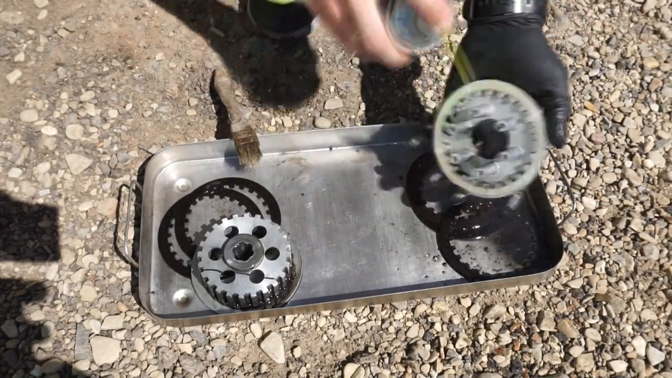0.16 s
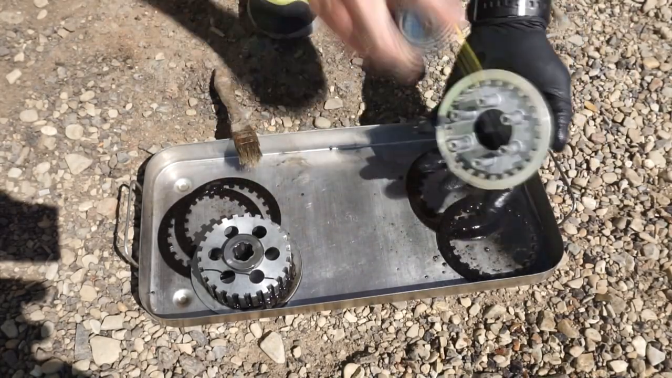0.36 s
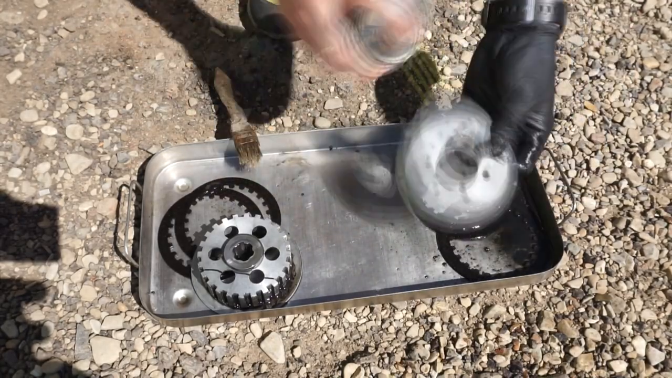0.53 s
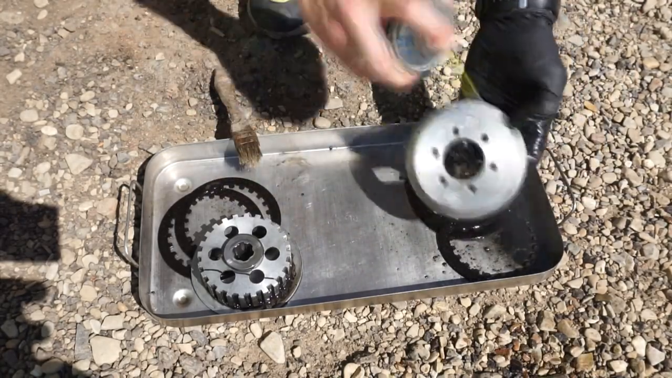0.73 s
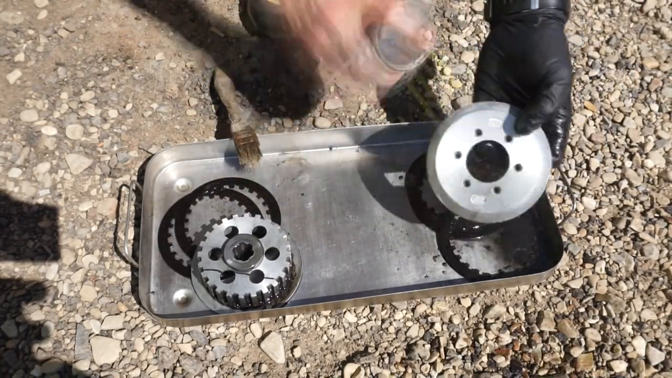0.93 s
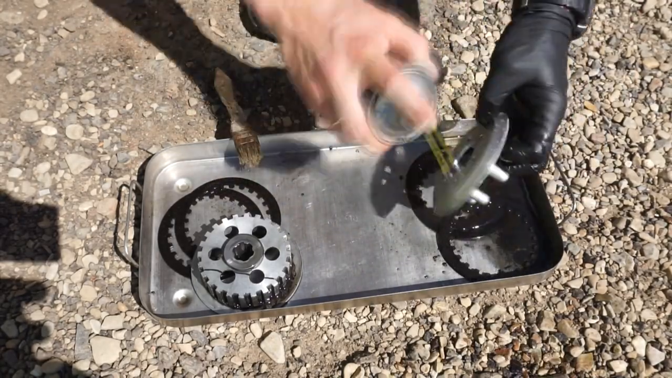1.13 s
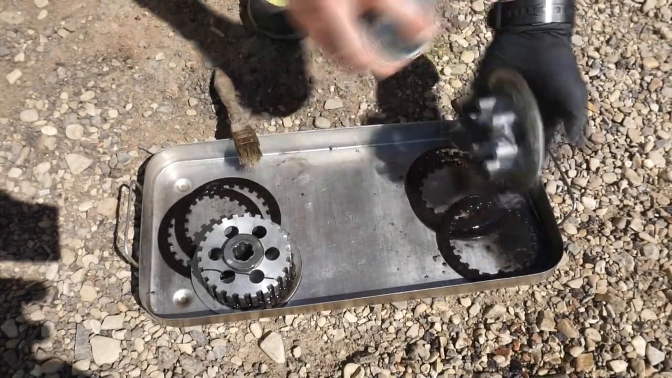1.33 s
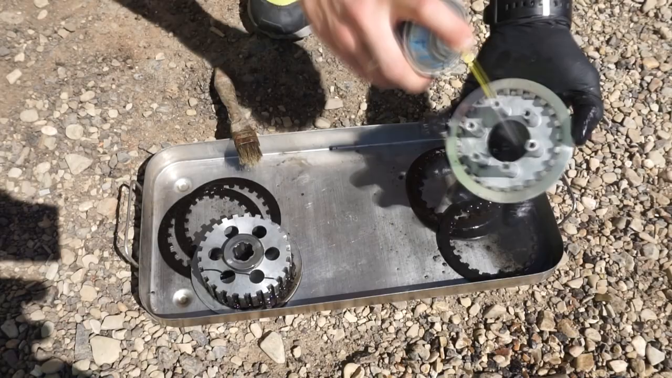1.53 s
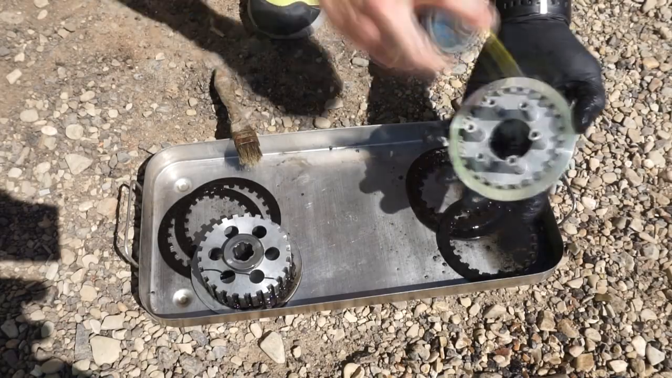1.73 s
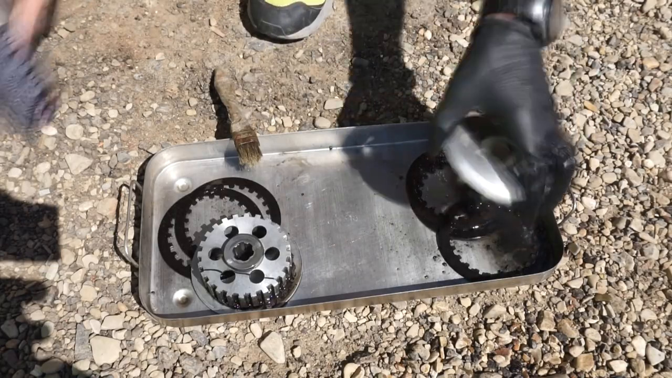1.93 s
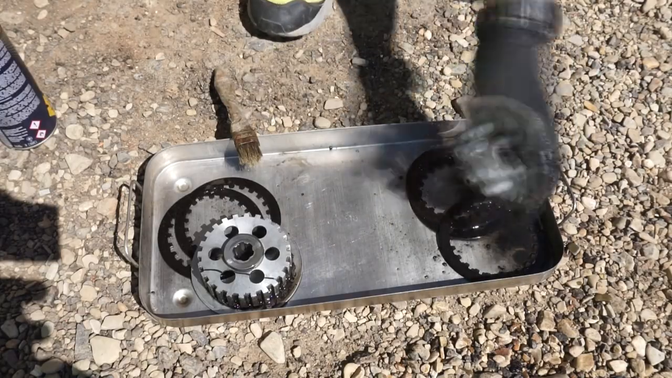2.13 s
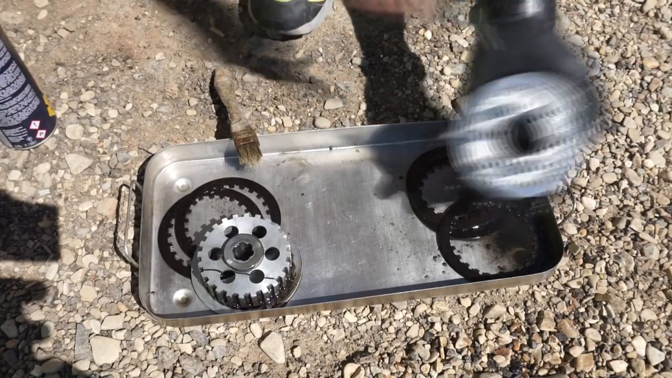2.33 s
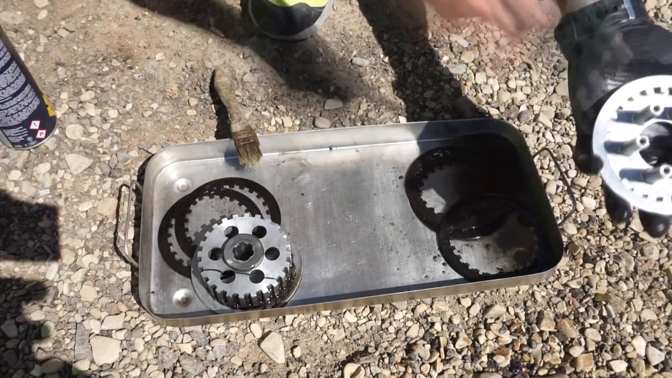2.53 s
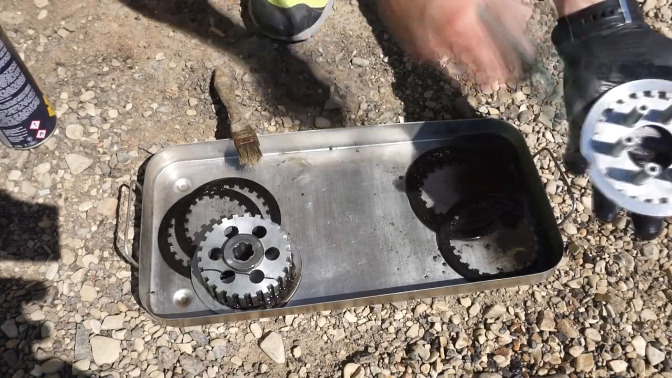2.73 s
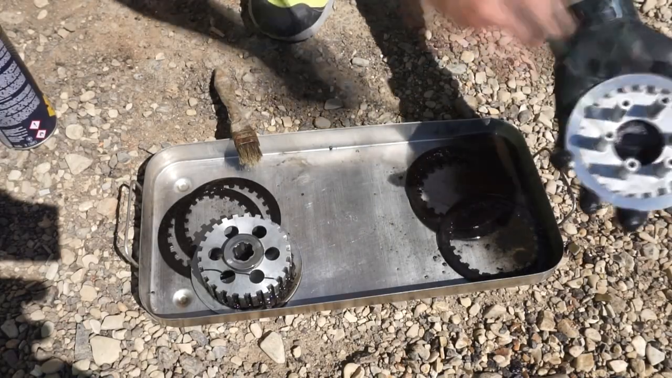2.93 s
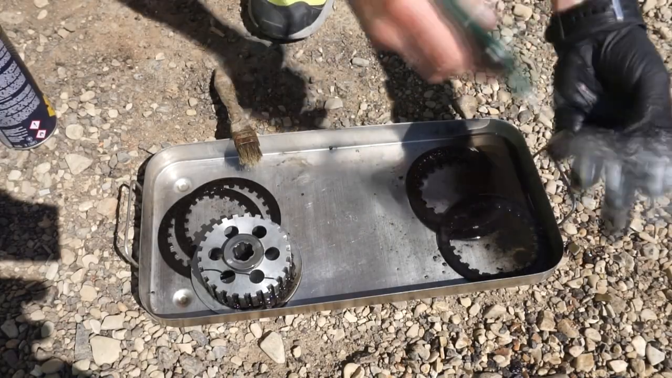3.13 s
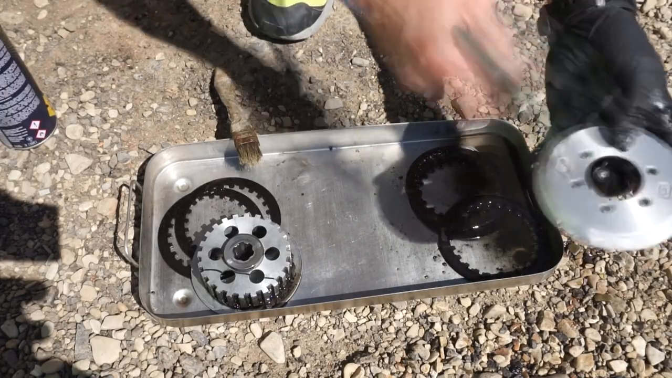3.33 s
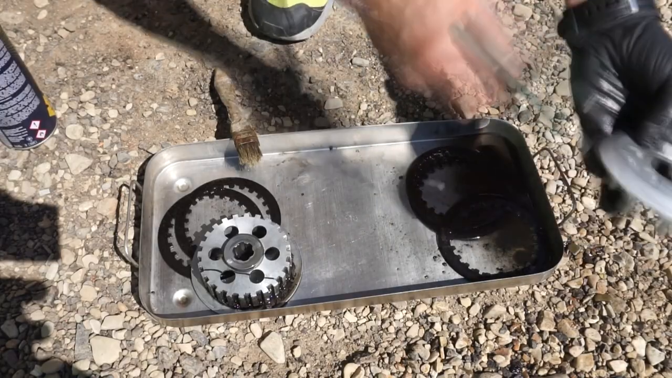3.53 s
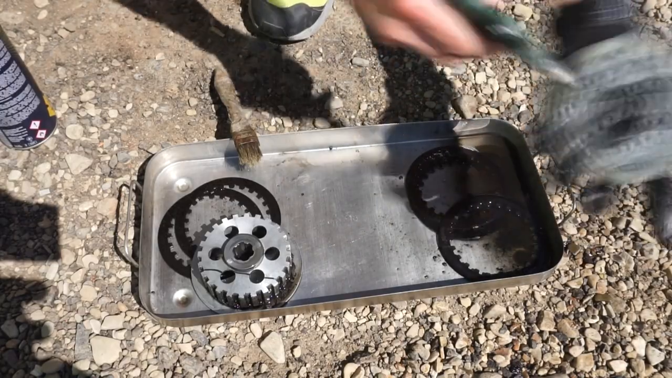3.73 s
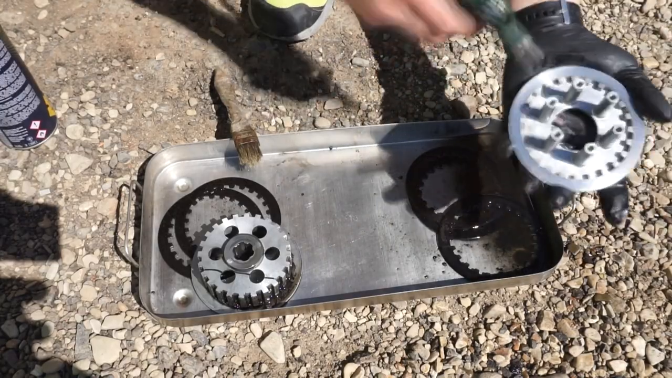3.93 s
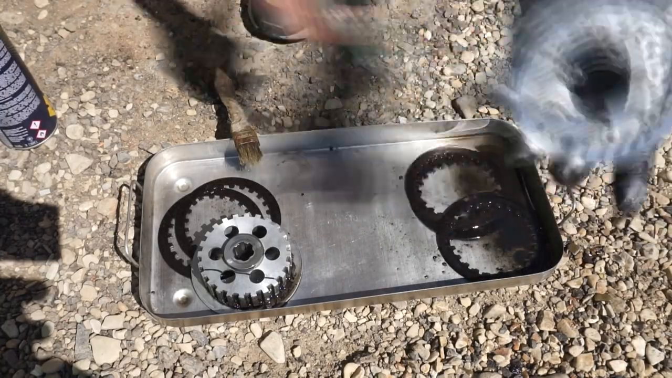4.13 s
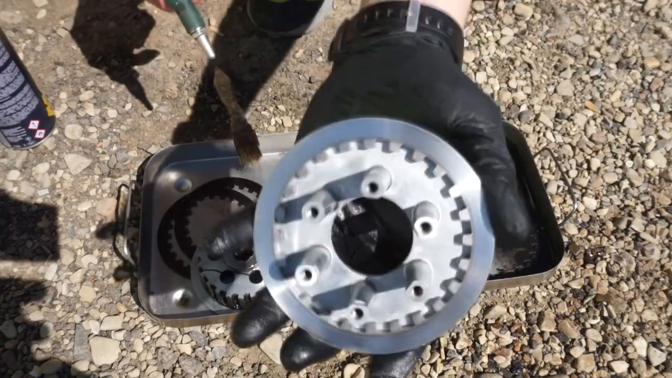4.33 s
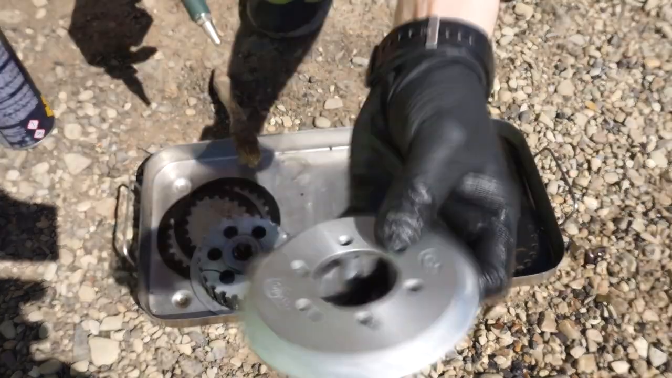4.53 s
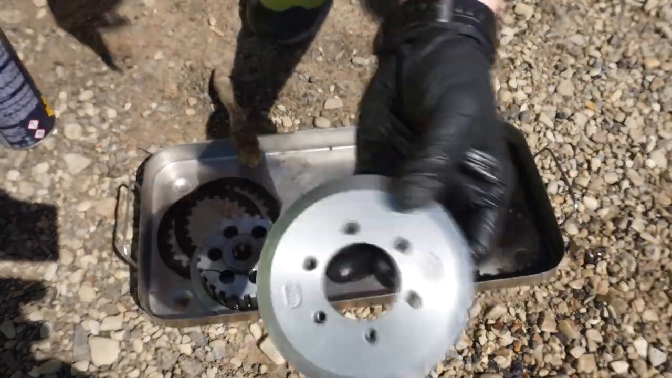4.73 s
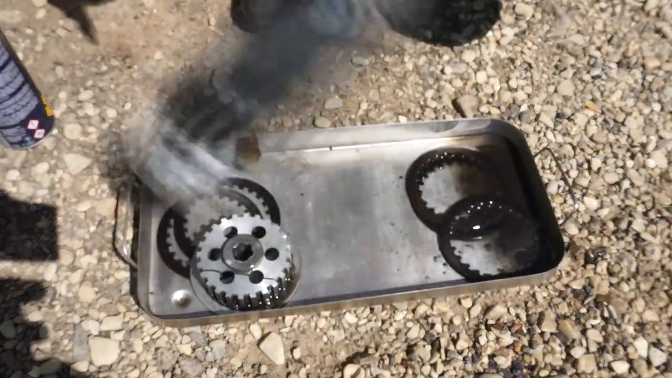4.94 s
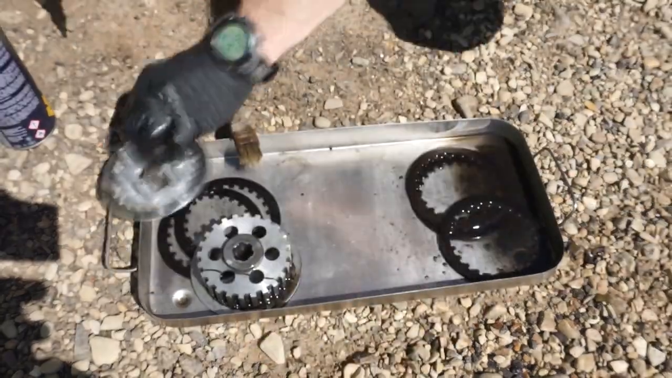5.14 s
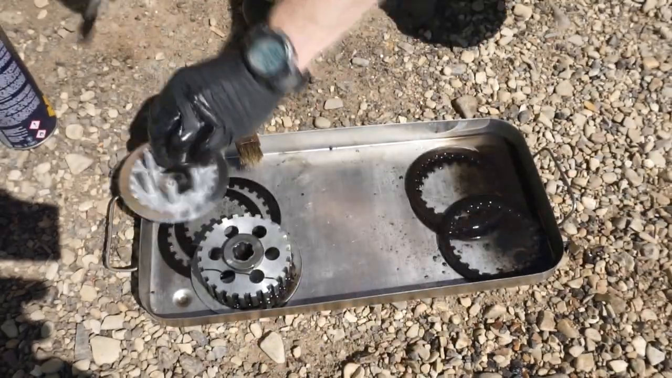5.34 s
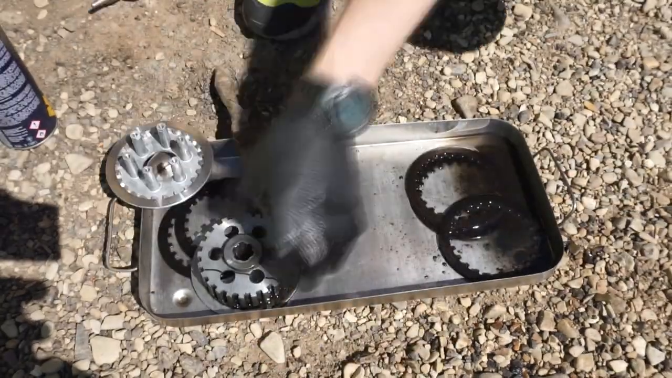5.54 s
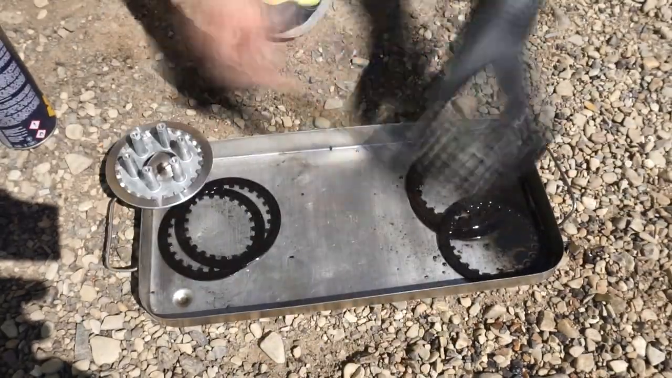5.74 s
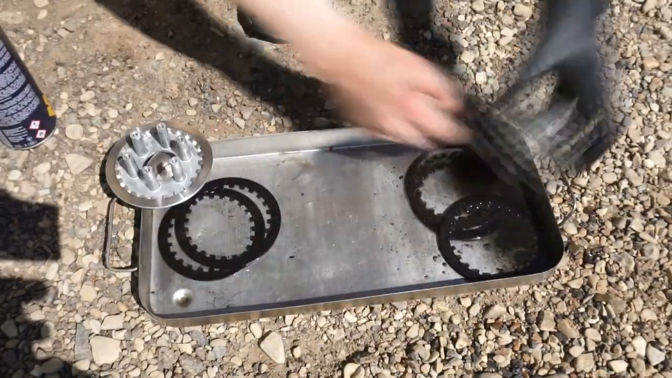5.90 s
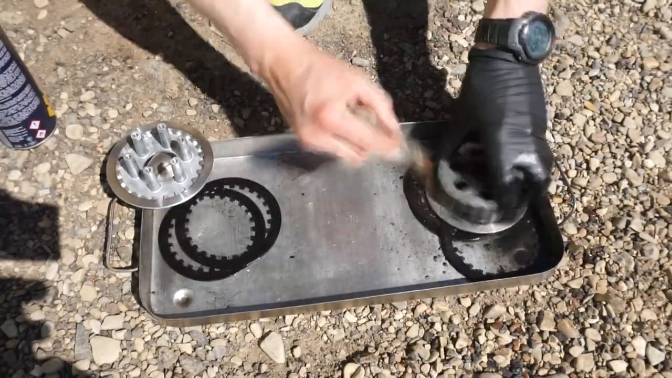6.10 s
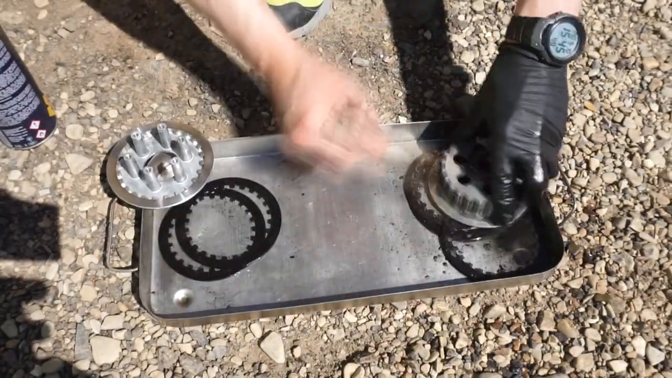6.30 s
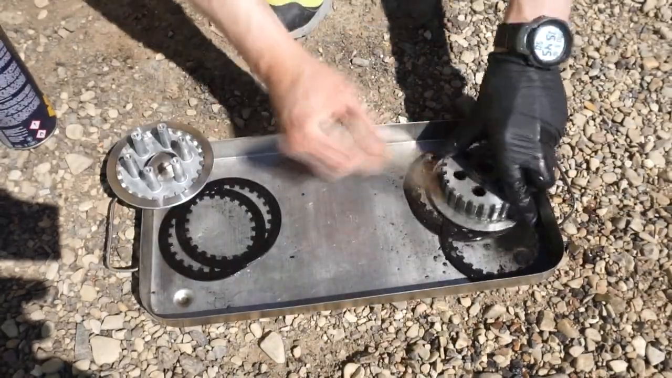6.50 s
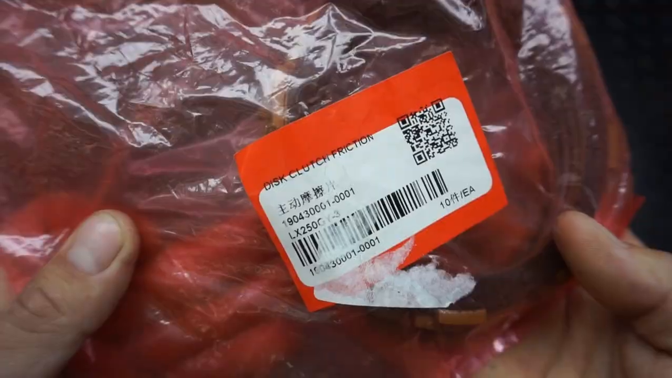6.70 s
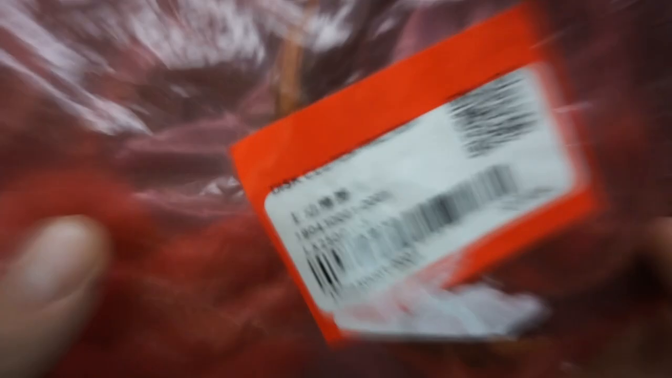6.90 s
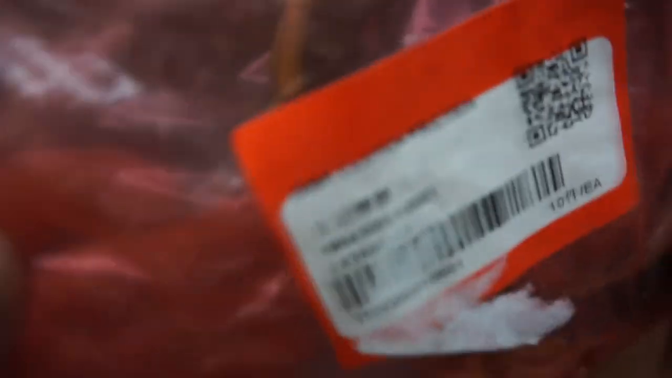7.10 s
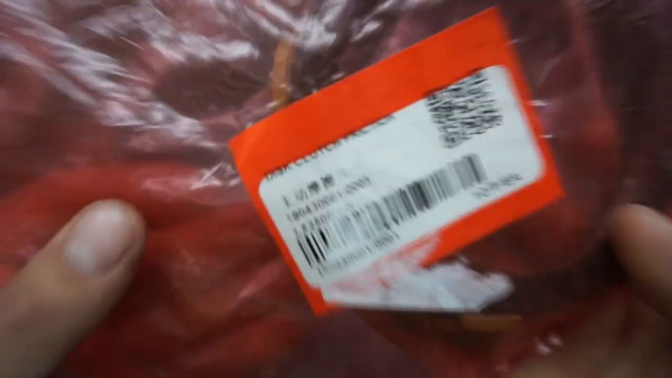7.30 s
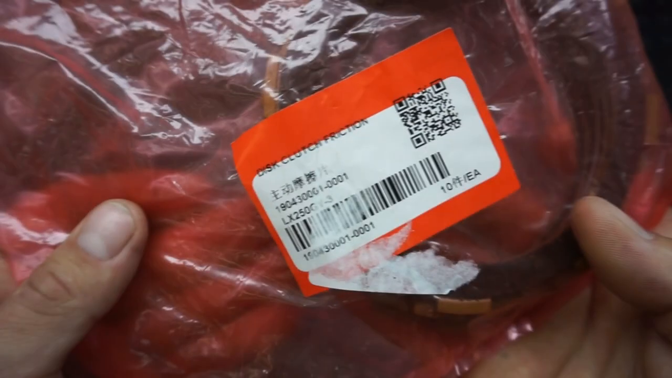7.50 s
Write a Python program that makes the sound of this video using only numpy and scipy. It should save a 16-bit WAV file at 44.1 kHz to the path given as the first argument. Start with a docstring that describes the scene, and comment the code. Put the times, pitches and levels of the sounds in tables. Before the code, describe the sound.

Outdoors, hissing spray bursts and harder air jets, metallic scraping and brushing, a vehicle-like rumble swelling, then a hard cut to crinkling plastic bag indoors.

```python
"""On gravel outdoors, clutch parts are cleaned over a metal tray; the scene then jumps indoors to a plastic bag.
Aerosol squirts and hard air blasts are turbulent noise coloured by the part; liquid drums on the tray as dull grains.
Scrapes and clinks excite the modes of a clutch hub, bristles hiss in strokes, and a rumble, like a vehicle's,
draws near as filtered noise with a sinking note. Indoors the film crackles in decaying sines and tuned snaps."""
import sys
import numpy as np
from scipy import signal
from scipy.fft import rfft, irfft, next_fast_len
from scipy.io import wavfile
from scipy.ndimage import uniform_filter1d

SR = 44100
rng = np.random.default_rng(int(sys.argv[2]) if len(sys.argv) > 2 else 0)


def to_wav(s):
    """Save 16-bit WAV."""
    ch = np.atleast_2d(s).T  # columns
    pcm = np.round(np.clip(ch, -1, 1) * 32767)  # PCM
    wavfile.write(sys.argv[1], SR, pcm.astype(np.int16))


N = 337799
T = np.arange(N) / SR  # s
JUMP_S = 6.628  # outdoors ends, indoors begins

# noise density of bristles and fine liquid fizz: [f/Hz, relative level/dB]
BRISTLE_SPECTRUM = [(800, -2.5), (2200, 2.5), (3500, 0), (5600, -1.5), (7000, -1), (10500, -0.5),
                    (13000, -8.5), (16000, -19.5)]
# noise density of gritty metal contact: [f/Hz, relative level/dB]
GRIT_SPECTRUM = [(300, -47), (700, 6.5), (1000, 4.5), (1500, 6.5), (2400, 3.5), (3300, -10), (5000, -11.5),
                 (11000, -30), (13500, -37)]
# how three places reach the two microphones:
# [f/Hz, left minus right level/dB, coherence, left's phase lead/rad]
CAN_PLACE = [(500, -0.5, 0.82, 0.3), (2500, -1.5, 0.88, 0), (4470, -1, 0.94, -0.26), (8900, 0.5, 0.74, 0.8),
             (11900, 4.5, 0.84, -2.03), (15000, -4, .3, -2)]
RIGHT_PLACE = [(120, 9.5, 0.68, 2.5), (494, -1.5, 1, -1.3), (2420, -5, 0.78, 0.7), (3650, -6, 0.31, -0.76),
               (6910, -2, 0.98, -1.22), (11370, 3, 0.37, -2.5), (14850, -2.5, 0.34, -5.5)]
LEFT_PLACE = [(402, -1, 1, 0.68), (2000, 1, 0.88, 0.0061), (3980, 3, 0.4, 0.012), (11750, 4.5, 0.14, 1)]


def amp(db):
    """Amplitude ratio of a level in dB."""
    return 10 ** (np.asarray(db) / 20)


def evened(x):
    """Normalization to unit rms."""
    return x / np.sqrt(np.mean(x ** 2) + 1e-20)


def read(points, hz, axis=1):
    """Interpolation of one table column over logarithmic frequency."""
    columns = np.transpose(points)
    return np.interp(np.log(hz + 1), np.log(columns[0] + 1), columns[axis])


def level(rows):
    """Gain over time from a piecewise linear level curve."""
    return amp(np.interp(T, *np.transpose(rows)))


def add(mix, s, sound):
    """Superposition: adds a sound to the mix, in place, from time s."""
    part = mix[:, round(s * SR):][:, :sound.shape[1]]
    part += sound[:, :part.shape[1]]


def filtered(x, gain):
    """Linear filtering: multiplies the spectrum by a gain given as a function of f/Hz."""
    size = next_fast_len(x.shape[-1], True)
    spectrum = rfft(x, size) * gain(np.fft.rfftfreq(size, 1 / SR))
    return irfft(spectrum, size)[..., :x.shape[-1]]


def placed(z, place):
    """Interaural-style cues: level difference, coherence and phase lead made from two unrelated signals."""
    def same(hz):
        return np.clip(read(place, hz, axis=2), 0, 1)

    def lead(hz):
        return read(place, hz, axis=3) * np.minimum(hz / 1000, 1)  # long waves arrive nearly in step

    right = filtered(z[0], lambda hz: same(hz) * np.exp(-1j * lead(hz)))
    right += filtered(z[1], lambda hz: np.sqrt(1 - same(hz) ** 2))
    return filtered(np.array([z[0], right]), lambda hz: amp(np.outer([.5, -.5], read(place, hz))))


def coloured(z, spectrum):
    """Spectral shaping with a bass roll-off below 20 Hz, at unit rms."""
    return evened(filtered(z, lambda hz: amp(read(spectrum, hz)) * hz / (hz + 20)))


def noise():
    """Gaussian white noise in two independent channels."""
    return rng.standard_normal((2, N))


def grains(per_s, spread_db):
    """Random point process of tiny impacts with skewed sizes: a few are much larger than the rest."""
    size_db = spread_db * np.minimum(rng.exponential(1, N), 4)
    size = amp(size_db) * (rng.random(N) < per_s / SR)
    return evened(size * noise())


def two_bands(x, split_hz, low_gain, high_gain):
    """Band splitting: each band is brought to unit rms and follows its own gain."""
    low = filtered(x, lambda hz: 1 / (1 + (hz / split_hz) ** 10))
    return evened(low) * low_gain + evened(x - low) * high_gain


def impulse(spectrum, tilt_db=0, size=4096):
    """Minimum-phase click by cepstral folding; the tilt in dB per octave takes hold above about 1 kHz."""
    hz = np.fft.rfftfreq(size, 1 / SR)
    cepstrum = irfft(np.log(amp(read(spectrum, hz) + tilt_db * np.log2(1 + hz / 1000))))
    cepstrum[1:size // 2] *= 2
    cepstrum[size // 2 + 1:] = 0
    return irfft(np.exp(rfft(cepstrum)))


def blow(click, scatter, decay_s, size=4096):
    """Impact with chatter: a click convolved with a spike and decaying noise, at peak 1."""
    drive = scatter * rng.standard_normal((2, size)) * np.exp(-np.arange(size) / SR / decay_s)
    drive[0, 0] = 1
    drive[1, 0] = rng.choice([-1, 1])
    sound = signal.fftconvolve(drive, click[None], axes=1)[:, :size]
    return sound / abs(sound).max()


def gate(start, end, ramp_s):
    """Smooth switching: cubic ramps, at half height at start and end."""
    rise, fall = np.clip((np.array([T - start, end - T]) / ramp_s + 1) / 2, 0, 1)
    opening = np.minimum(rise, fall)
    return opening ** 2 * (3 - 2 * opening)


def swell(s, rise_s, fall_s):
    """Exponential growth to 1 at time s, then exponential decay."""
    return np.exp(-np.minimum(np.maximum((s - T) / rise_s, (T - s) / fall_s), 40))


def shifting(x, depth_db, size):
    """Time-varying resonance: smooth random gains over the spectrogram, changing over about size frames."""
    z = signal.stft(x, nperseg=512)[2]
    patches = rng.standard_normal(z.shape[1:])
    for _ in range(2):
        patches = uniform_filter1d(patches, size=3, axis=0)
        patches = uniform_filter1d(patches, size=size, axis=1)
    return signal.istft(z * amp(depth_db * evened(patches)), nperseg=512)[1][:, :N]


def ring(x):
    """Modal superposition: the hub's resonances answer any drive, neighbours in opposite phase."""
    # modes of a clutch hub against the tray rim: [f/Hz, half-power width/Hz, relative level/dB]
    hub_modes = [(707, 48.4, 8.5), (1430, 81, 1), (1800, 30, -1.5), (2070, 90, -1), (2570, 34, -9),
                 (3810, 41, -12.5), (4370, 39, -15), (5450, 18, -17), (6030, 25, -20.5), (6540, 30, -17.5),
                 (7060, 48, -11.5), (7560, 42, -11.5), (9060, 38, -13.5), (10630, 47, -9.5)]

    def response(hz):
        total = 0
        for k, (f, width, db) in enumerate(hub_modes):
            total = total + (-1) ** k * amp(db) / (1 + 1j * (hz - f ** 2 / (hz + 1)) / width)
        return total

    return filtered(x, response)


def rocking(x, depth, rate_hz):
    """Frequency modulation by a wandering delay: low modes bend by an rms share depth, high ones stay steady."""
    bend = filtered(rng.standard_normal(N), lambda hz: (hz / rate_hz) ** 2 / (1 + (hz / rate_hz) ** 6))
    drift = np.cumsum(depth * evened(bend))
    low = filtered(x, lambda hz: 1 / (1 + (hz / 4400) ** 10))
    moment = np.arange(N) + drift - drift.mean()
    return x - low + np.array([np.interp(moment, np.arange(N), side) for side in low])


def jet(spectrum, place, presses, wet_db, swell_db, ramp_s, cavity_db, flutter_db):
    """Turbulent jet noise; holes and ribs of the turning part lend it shifting resonances."""
    z = shifting(placed(noise(), place), cavity_db, size=18)
    splash = hiss = 0
    for opens, shuts, hiss_db, splash_db in presses:
        growth_db = swell_db * np.interp(T, [opens, shuts], [-.5, .5])
        flow = gate(opens, shuts, ramp_s) * amp(growth_db)
        splash = splash + amp(splash_db) * flow
        hiss = hiss + amp(hiss_db) * flow
    flutter = flutter_db * evened(uniform_filter1d(rng.standard_normal(N), size=900))
    # impact on the part lies below 6.5 kHz, nozzle hiss above
    return two_bands(coloured(z, spectrum), 6500, splash * amp(wet_db + flutter), hiss * amp(flutter / 2))


def aerosol():
    """Jet noise in short squirts; cavity resonance makes pockets of the hub hoot as the stream passes over."""
    # presses of the can's valve: [opens t/s, shuts t/s, nozzle hiss level/dB, splash on the part level/dB]
    squirts = [(0.024, 0.154, -35.5, -40.5), (0.237, 0.388, -34.5, -42), (0.44, 0.489, -34, -40),
               (0.535, 0.565, -35.5, -43.5), (0.674, 0.852, -37.5, -43.5), (0.919, 1.062, -36, -44.5),
               (1.116, 1.19, -36, -42.5), (1.223, 1.335, -37.5, -43), (1.489, 1.546, -36.5, -43.5),
               (1.584, 1.714, -33.5, -39.5), (1.73, 1.847, -35.5, -41.5)]
    # noise density of the spray: [f/Hz, relative level/dB]
    spray_spectrum = [(400, -18), (900, -11.5), (1250, -2), (1550, -8.5), (2200, -3.5), (3300, -7),
                      (4400, -3.5), (6400, -3), (8000, 3), (10400, 3.5), (12500, 0.5), (15700, -4)]
    # the stream passes over a pocket: [t/s]
    pocket_times = [1.03, 1.16, 1.54, 1.8]
    pocket_hz, pocket_width_hz, pocket_db, pocket_s = 2120, 230, 9, 0.018
    # each squirt grows by swell_db as the finger presses home
    spray = jet(spray_spectrum, CAN_PLACE, squirts, wet_db=0, swell_db=2.5,
                ramp_s=0.023, cavity_db=1.8, flutter_db=0.7)
    hoot = filtered(spray, lambda hz: 1 / (1 + ((hz - pocket_hz) / pocket_width_hz) ** 2))
    passing = sum(swell(s, pocket_s, pocket_s) for s in pocket_times)
    return spray + hoot * (amp(pocket_db * passing) - 1)


def air_blasts():
    """Stronger jet noise off to the right, with a delayed, low-passed reflection from further away."""
    # blasts of air: [opens t/s, shuts t/s, relative nozzle hiss level/dB, relative roar on the part level/dB]
    blasts = [(2.45, 2.483, -27.5, -38.5), (2.516, 3.093, -30.5, -37), (3.299, 3.668, -32, -36.5),
              (4.029, 4.149, -29.5, -37)]
    # noise density of the air jet: [f/Hz, relative level/dB]
    air_spectrum = [(150, -46.5), (350, -25), (650, -10.5), (1200, -8.5), (1600, -4), (2450, 1), (3400, -3),
                    (4400, 1), (6200, -4), (7600, -3.5), (11500, -4.5), (15500, -7)]
    hollow_s, hollow_length_s, hollow_db, hollow_hz = 3.46, 0.095, -17, 1094
    # the roar is stronger at first, while the part is still wet
    wet_db = 9.5 * np.exp(-np.maximum(T - blasts[0][0], 0) / 0.13)
    air = amp(2.5) * jet(air_spectrum, RIGHT_PLACE, blasts, wet_db, swell_db=0.4,
                         ramp_s=0.022, cavity_db=1.5, flutter_db=2.0)
    # the roar briefly loses its lows as the part is turned over
    lows = filtered(air, lambda hz: 1 / (1 + (hz / hollow_hz) ** 4))
    turned = gate(hollow_s - hollow_length_s / 2, hollow_s + hollow_length_s / 2, ramp_s=0.022)
    air = air + lows * (amp(hollow_db * turned) - 1)
    # the echo arrives 51 ms late with the channels swapped
    far = filtered(air[::-1], lambda hz: np.exp(-2j * np.pi * hz * 0.051) / (1 + (hz / 4500) ** 4))
    return air + amp(-29.5) * far


def tray():
    """Droplet impact: liquid drums and fizzes on the tray floor, which the gravel damps."""
    # the stream of cleaner sweeps onto the tray floor: [t/s, level of the drumming/dB]
    sweeps = [(0.569, -35.5), (.835, -41.5), (1.07, -47), (1.35, -47), (1.495, -52.5)]
    # slugs of liquid on the tray: [t/s, peak level/dB]
    slugs = [(0.561, -37), (.618, -25.5), (1.378, -26)]
    # response of the damped floor: [f/Hz, relative level/dB]
    thud_spectrum = [(40, -31.5), (90, -8.5), (190, 1), (380, -5.5), (600, -16), (1000, -36), (2500, -52),
                     (9000, -80.5)]
    stream = sum(amp(db) * swell(s, rise_s=0.055, fall_s=0.051) for s, db in sweeps)
    drumming = coloured(placed(grains(600, 1.2), CAN_PLACE), thud_spectrum)
    fizz = coloured(placed(noise(), CAN_PLACE), BRISTLE_SPECTRUM)  # the stream breaking up
    out = (drumming + amp(-18) * fizz) * stream
    for s, db in slugs:
        add(out, s, amp(db) * blow(impulse(thud_spectrum), scatter=0.054, decay_s=0.013)[:1])
    return out


def bumps():
    """Damped resonance: each bump of a part sets the tray floor shuddering around one low pitch."""
    # parts bump dully on the tray: [t/s, level/dB, f/Hz]
    knocks = [(.008, -53.5, 620), (1.868, -52, 520), (2.22, -58.5, 370), (2.352, -50, 420),
              (3.239, -64.5, 428), (5.49, -45, 348), (5.655, -43.5, 298), (5.856, -31.5, 263),
              (5.945, -40.5, 228), (6.1, -62, 652)]
    q = 1.6
    shudder, out = placed(noise(), RIGHT_PLACE), np.zeros((2, N))
    for s, db, pitch in knocks:
        body = filtered(shudder, lambda hz: 1 / (1 + (q * (hz / pitch - pitch / (hz + 1))) ** 2))
        out += amp(db) * evened(body) * swell(s, rise_s=0.0058, fall_s=0.038)
    return out


def scrapes():
    """Stick-slip friction: fine slips and coarser catches drive the hub; the moving contact shifts the colour."""
    # metal dragged over metal: [middle t/s, length t/s, relative level/dB]
    drags = [(4.774, 0.14, -52), (5.09, 0.012, -37.5), (5.106, 0.03, -42), (5.135, 0.015, -33),
             (5.145, 0.035, -35), (5.168, 0.05, -38.5), (5.236, 0.052, -37), (5.27, 0.045, -41),
             (5.345, 0.049, -38.5), (5.389, 0.037, -41), (5.452, 0.056, -29), (5.767, 0.029, -43.5),
             (5.807, 0.07, -41), (6.099, 0.023, -43.5), (6.194, 0.021, -39.5), (6.287, 0.028, -37),
             (6.36, 0.029, -31.5)]
    force = 0
    for s, length, db in drags:
        force = force + amp(db) * np.exp(-np.minimum((np.pi * (T - s) / length) ** 2, 50))
    slips = grains(9000, 1.9) + 0.36 * grains(850, spread_db=1.5)  # the rarer catches are coarse grit
    slips = evened(shifting(placed(slips, LEFT_PLACE), depth_db=2, size=3))
    gain = 1 / np.std(ring(slips))
    rub = coloured(slips, GRIT_SPECTRUM) * force
    # the hub rocks on the rim
    modes = gain * rocking(ring(slips * force), depth=0.013, rate_hz=11)
    return amp(-1.5) * rub + amp(-3.5) * modes


def clinks():
    """Impulsive excitation: sharp metal contacts with the hub's modal response added."""
    # metal touching metal: [t/s, relative peak level/dB, treble tilt/dB per octave]
    contacts = [(1.965, -35.5, -0.5), (2.025, -31, 9), (2.041, -30, 8), (2.243, -27.5, 3),
                (2.258, -35.5, 1.5), (4.783, -33, -18), (4.833, -43, -17), (5.084, -28, 0),
                (5.101, -34, -3), (5.116, -26.5, -17), (5.132, -33, -1), (5.145, -23, -7), (5.451, -20, -7),
                (5.538, -25, -4.5), (5.857, -26.5, -8.5), (5.998, -43, -2)]
    # spectrum of a bare contact: [f/Hz, relative level/dB]
    tick_spectrum = [(300, -32), (1000, -7.5), (2200, 8), (4000, 5.5), (7000, 2), (9000, -1), (11500, 4),
                     (14500, -20.5)]
    out = np.zeros((2, N))
    for s, db, tilt in contacts:
        add(out, s, amp(db + 1.5) * blow(impulse(tick_spectrum, tilt), scatter=0.11, decay_s=0.0047))
    return placed(out + amp(6.0) * ring(out), LEFT_PLACE)


def flicks():
    """Soft broadband excitation: stream or glove brushes the hub's teeth and its upper modes sing, sharply tuned."""
    # touches on the teeth of the held hub: [t/s, level of the singing/dB]
    touches = [(.6, -56.5), (1.39, -63), (1.47, -58.5), (4.525, -63), (4.635, -66.5)]
    rub = coloured(placed(noise(), CAN_PLACE), BRISTLE_SPECTRUM)
    # ringing twice narrows the modes
    sing = evened(filtered(ring(ring(rub)), lambda hz: 1 / (1 + ((hz - 5660) / 850) ** 4)))
    touch = sum(amp(db) * swell(s, rise_s=.012, fall_s=0.031) for s, db in touches)
    return (sing + amp(-3) * rub) * touch


def squeak():
    """Friction squeal as narrow-band noise: the rubber glove slips and chirps once on the wet part."""
    rub = filtered(placed(noise(), RIGHT_PLACE), lambda hz: 1 / (1 + ((hz - 2960) / 200) ** 2))
    return amp(-52.5) * evened(rub) * swell(2.23, rise_s=0.011, fall_s=.005)


def brush():
    """Friction noise: wet bristles and glove hiss over the metal, and whole tufts snag on the teeth and tap."""
    # strokes of glove and brush over the parts: [start t/s, end t/s, relative level/dB]
    stroke_rows = [(2.098, 2.17, -70.5), (4.497, 4.569, -71), (5.773, 5.832, -54.5), (5.835, 5.921, -58),
                   (6.084, 6.137, -52), (6.16, 6.217, -50), (6.269, 6.317, -48.5), (6.348, 6.599, -51)]
    strokes = []
    for start, end, db in stroke_rows:
        trail = swell(end, rise_s=0.0055, fall_s=0.019)  # the bristles trail off
        strokes.append(amp(db) * np.maximum(gate(start, end, ramp_s=0.011), trail))
    hiss = amp(6.5) * coloured(placed(noise() + grains(1300, 2.8), RIGHT_PLACE), BRISTLE_SPECTRUM)
    snags = amp(-1.5) * coloured(placed(grains(400, 2), RIGHT_PLACE), GRIT_SPECTRUM)
    return (hiss + snags) * np.max(strokes, axis=0)


def crackles(low_hz, high_hz, cycles, spread_db, count, size=256):
    """Buckling of film: decaying sines of random pitch, scattered over the indoor time."""
    when, pitch, strength, side = rng.random((count, 4)).T
    turns = np.outer(low_hz * (high_hz / low_hz) ** pitch, np.arange(size) / SR)
    strengths = amp(-spread_db * np.log(strength + 0.032))[:, None]
    pops = np.sin(2 * np.pi * turns) * np.exp(-turns / cycles) * strengths
    starts = (JUMP_S * SR + when * (N - size - JUMP_S * SR)).astype(int)
    at = starts[:, None] + np.arange(size)
    signs = np.sign(side - .5)[:, None]  # random polarity decorrelates the second channel
    out = np.array([np.bincount(at.ravel(), (pops * gain).ravel(), N) for gain in (1, signs)])
    return out / np.std(out[:, T > JUMP_S])


def bag():
    """Snap-through of creased film: tuned snaps in flurries of small crackles, over the rustle of one squeeze."""
    # creases snapping in the bag: [t/s, peak level before placing/dB, f/Hz]
    snaps = [(6.852, -37, 3660), (6.911, -35, 1950), (6.954, -28, 1740), (7.008, -22, 2900),
             (7.038, -19, 2860), (7.06, -28.5, 781), (7.127, -20.5, 802), (7.186, -29, 3500),
             (7.199, -21, 1730), (7.222, -36, 2390), (7.245, -26, 1770), (7.256, -44, 2010),
             (7.274, -34, 830), (7.365, -29, 790), (7.396, -33, 1970), (7.425, -29, 3020),
             (7.433, -34, 2660), (7.458, -26.5, 3450), (7.532, -28.5, 3800)]
    # spectrum of the film: [f/Hz, relative level/dB]
    film_spectrum = [(100, -23.5), (380, 0.5), (600, -6), (800, 0.5), (1020, -15), (1400, -4), (2600, -3.5),
                     (5200, -10), (9600, -16), (16000, -32)]
    crease_db, crease_q = 8, 2.9  # each crease rings briefly at its own pitch
    # the hands tighten on the bag and let go
    strain = amp(-52) * swell(7.2, rise_s=0.28, fall_s=0.29) * (T > snaps[0][0])
    strain = strain + sum(amp(db - 22.5) * swell(s, rise_s=0.013, fall_s=0.013) for s, db, _ in snaps)
    small = crackles(low_hz=740, high_hz=6750, cycles=2.6, spread_db=4.5, count=650)
    small = filtered(small, lambda hz: (1j * hz / (1j * hz + 350)) ** 2)  # thin film radiates no bass
    rustle = coloured(grains(3000, 1.2), film_spectrum)
    out = (amp(-3.5) * small + amp(-4.0) * rustle) * strain
    for s, db, pitch in snaps:
        snap = blow(impulse(film_spectrum, tilt_db=3.5), scatter=0.18, decay_s=0.0049)
        snap = filtered(snap, lambda hz: 1 + amp(crease_db) / (1 + 2j * crease_q * (hz / pitch - 1)))
        add(out, s, amp(db) * snap / abs(snap).max())
    return placed(out, LEFT_PLACE)


def hum():
    """Narrow-band noise: slow random modulation of a gliding carrier gives a fuzzy, sinking note."""
    # the note in the rumble: [t/s, f/Hz]
    note_pitch = [(4.85, 188), (5.2, 155), (5.7, 140.4)]
    turn = np.exp(2j * np.pi * np.cumsum(np.interp(T, *np.transpose(note_pitch))) / SR)
    real, imaginary = filtered(noise(), lambda hz: 1 / (1 + (hz / 10) ** 4))
    return evened((turn * (real + 1j * imaginary)).real)


def rumble():
    """Filtered noise in approach: an uneven drone, deep while far, with a higher growl as it nears."""
    # level of the approaching rumble: [t/s, relative level/dB]
    approach = [(4.2, -99), (4.39, -68), (4.8, -56.5), (5.5, -50.5), (6.11, -42.5), (6.15, -37.5),
                (6.32, -33.5), (6.37, -28.5), (6.57, -22.5), (6.625, -30.5)]
    # noise density of the drone: [f/Hz, relative level/dB]
    rumble_spectrum = [(25, -48.5), (50, -21.5), (100, -4.5), (180, 10), (260, 5), (350, 9), (450, -2),
                       (600, -5.5), (850, -13), (1100, -15.5), (2400, -16.5), (4000, -22), (6500, -42)]
    # how the rumble reaches the two microphones:
    # [f/Hz, left minus right level/dB, coherence, left's phase lead/rad]
    distant_place = [(179, 0, 0.97, -0.46), (546, -3.5, 0.97, -0.75), (1660, -7.5, 0.86, -0.53),
                     (3530, -1.5, 0.77, -1.56)]
    far_db, near_db = -5, -4.5  # the upper roar gains on the low drone as it nears
    drone = coloured(placed(noise(), distant_place), rumble_spectrum)
    near = np.interp(T, [5.8, 6.45], [0, 1])
    deep = filtered(drone, lambda hz: 1 / (1 + (hz / 175) ** 4))
    growl = filtered(drone, lambda hz: 1 / (1 + ((hz - 580) / 110) ** 4))
    deep_share = np.interp(near, [0, 1], [.6, -.3])
    growl_share = np.interp(near, [0, 1], [-.2, .45])
    drone = drone + deep * deep_share + growl * growl_share
    waver_db = 0.35 * evened(filtered(rng.standard_normal(N), lambda hz: 1 / (1 + (hz / 14) ** 4)))
    gain = level(approach) * amp(waver_db) * (T > approach[0][0])
    roar = two_bands(drone, 371, amp(-1.3), amp(far_db + near * (near_db - far_db)))
    return gain * (roar + amp(-6.5) * (1 - near) * hum())


def yard():
    """Ambient noise: a faint outdoor wash with slowly shifting colour."""
    # noise density of the outdoors: [f/Hz, relative level/dB]
    yard_spectrum = [(40, -37), (150, -20.5), (360, -9), (750, -12.5), (2200, -15.5), (3800, -23.5),
                     (9900, -31.5), (16000, -39)]
    # level of the wash, which sinks away in the middle: [t/s, level/dB]
    yard_level = [(2.42, -59), (2.7, -70), (4.35, -86), (4.9, -62)]
    wash = shifting(placed(noise(), CAN_PLACE), depth_db=1, size=10)
    return coloured(wash, yard_spectrum) * level(yard_level)


def echoes(x, t60, dull_hz, size=22050):
    """Diffuse reverberation: convolution with exponentially decaying noise, weaker in the treble."""
    t = np.arange(size) / SR
    tail = rng.standard_normal((2, size)) * amp(-60 * t / t60) * (t > .004)
    tail = filtered(tail / np.linalg.norm(tail[0]), lambda hz: 1 / (1 + 1j * hz / dull_hz))
    return signal.fftconvolve(x, tail, axes=1)[:, :N]


def scene():
    """Superposition of sources: the work outdoors, then an abrupt change to the bag indoors."""
    # noise density of the room: [f/Hz, relative level/dB]
    room_spectrum = [(40, -35.5), (200, -17), (870, -6), (6500, -8.5), (16000, -13)]
    work = aerosol() + air_blasts() + tray() + bumps() + scrapes() + clinks() + flicks() + squeak() + brush()
    surroundings = amp(-14.5) * echoes(work, t60=0.21, dull_hz=2490)
    outdoors = work + surroundings + rumble() + yard()
    film = bag()
    walls = amp(-10) * echoes(film, t60=.3, dull_hz=5000)
    room = amp(-66.0) * coloured(placed(noise(), LEFT_PLACE), room_spectrum)
    indoors = film + walls + room
    inside = np.clip((T - JUMP_S) / 0.016 + .5, 0, 1)  # 16 ms crossfade
    return (1 - inside) * outdoors + inside * indoors


def record(dry):
    """Band limitation: a linear-phase low-pass at 15.9 kHz."""
    low_pass = signal.firwin(511, 15900, window=("kaiser", 9), fs=SR)
    return signal.oaconvolve(dry, low_pass[None], "same")


dry = scene()
out = record(dry)
to_wav(out)
```